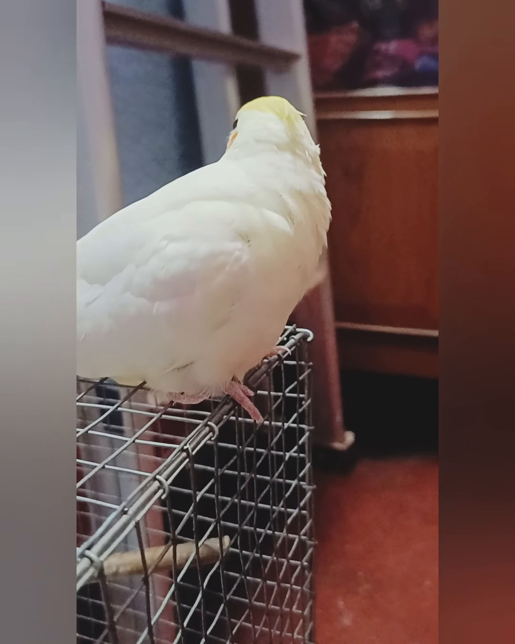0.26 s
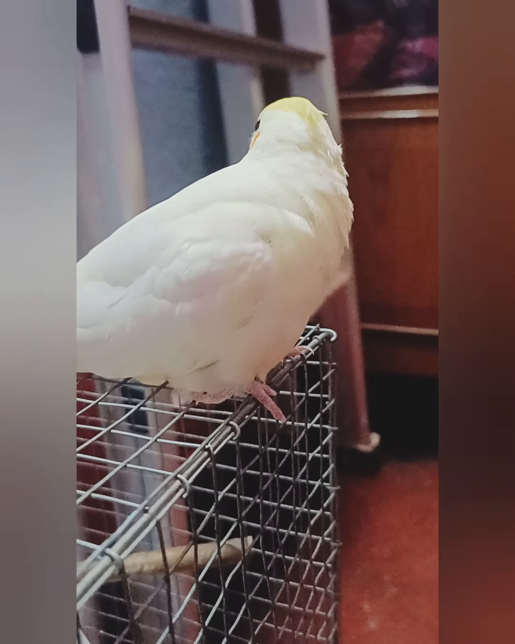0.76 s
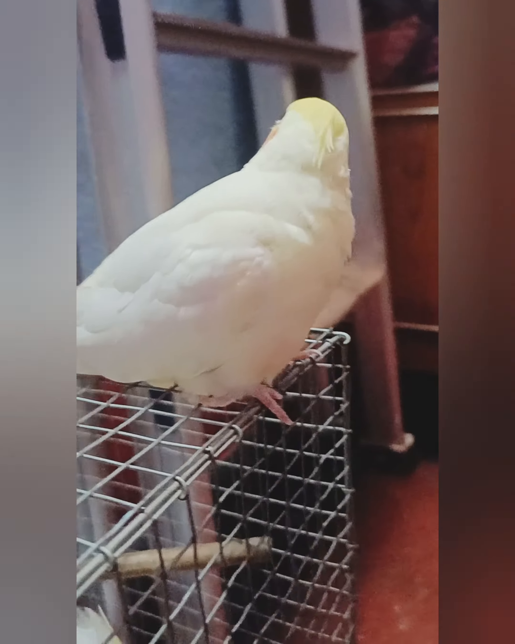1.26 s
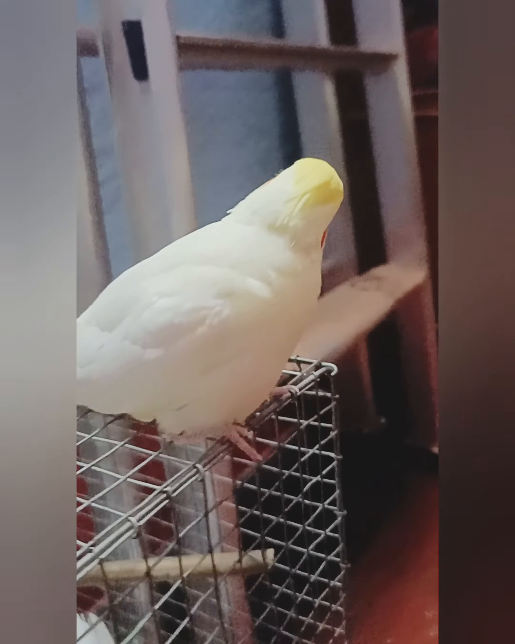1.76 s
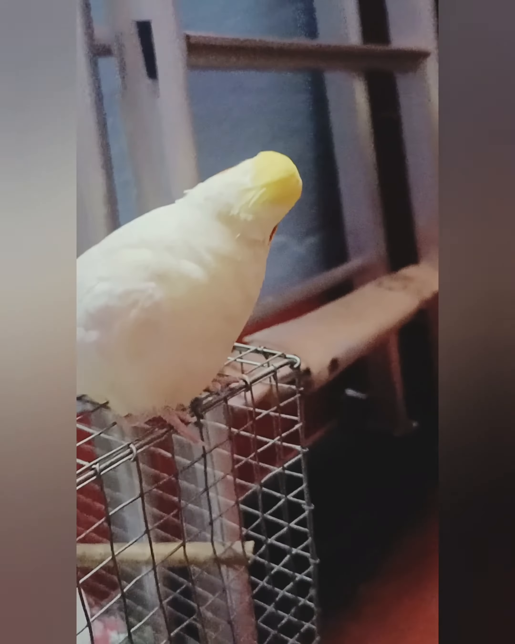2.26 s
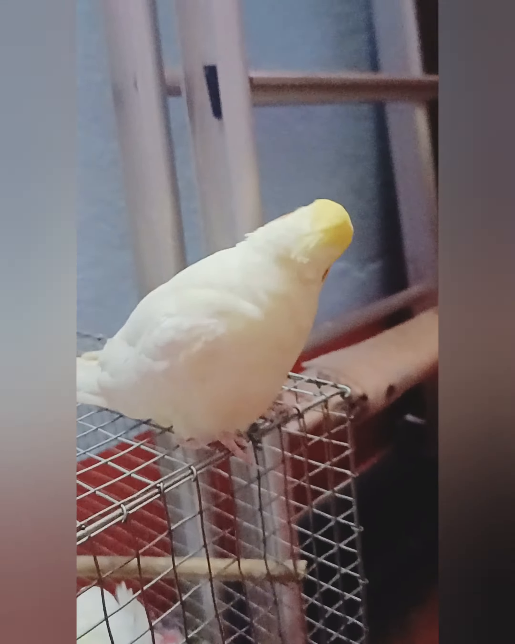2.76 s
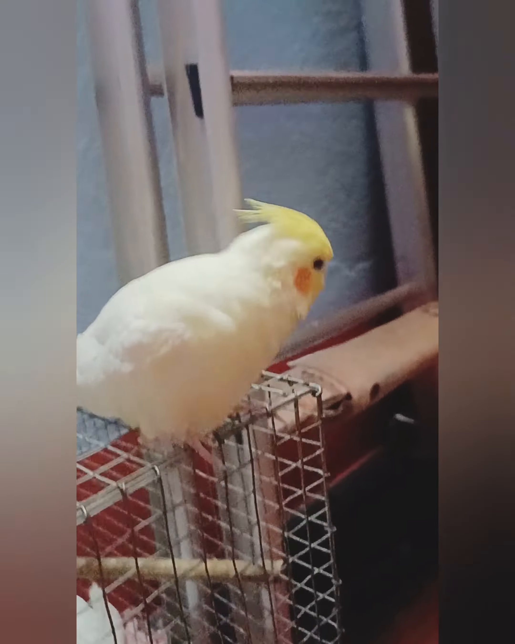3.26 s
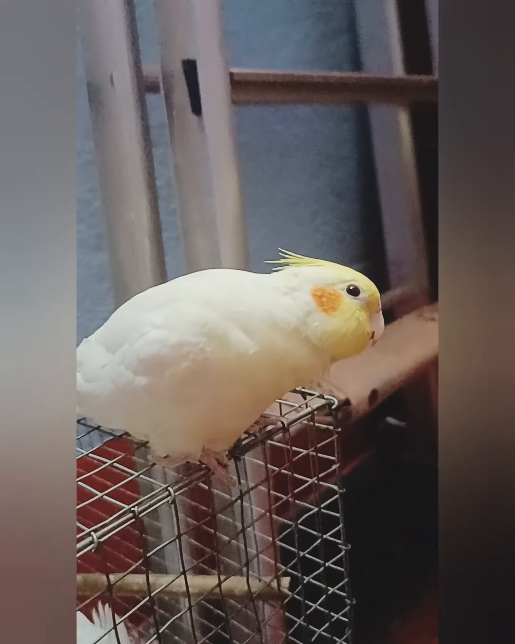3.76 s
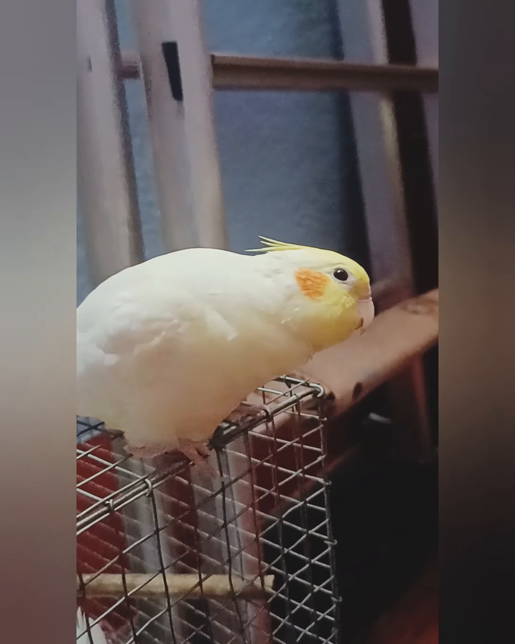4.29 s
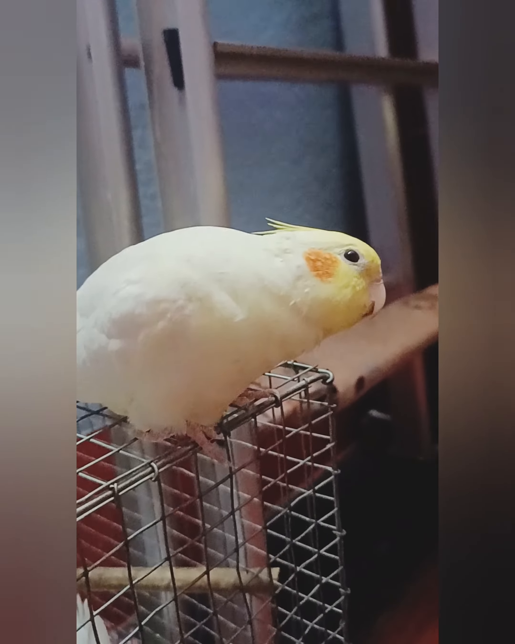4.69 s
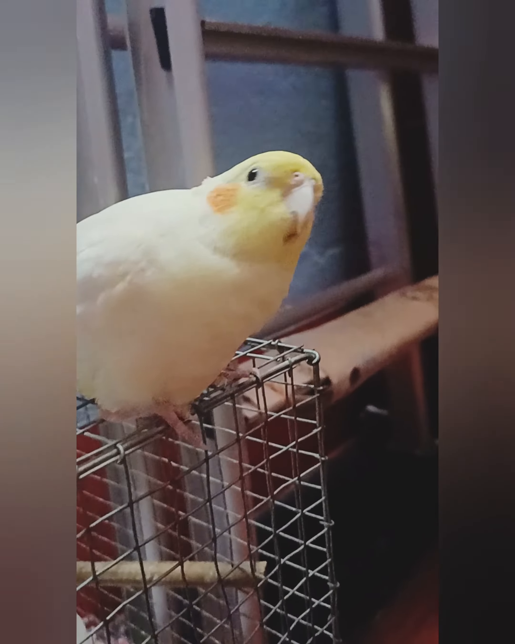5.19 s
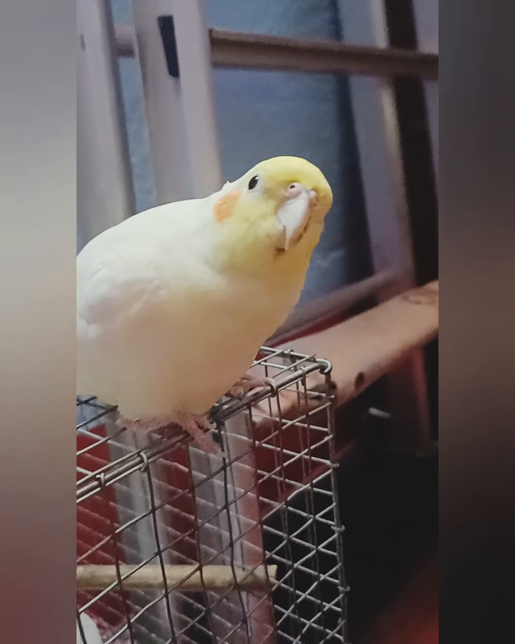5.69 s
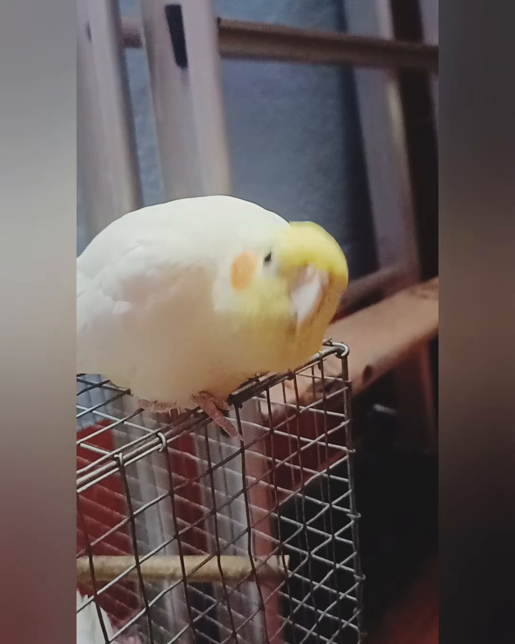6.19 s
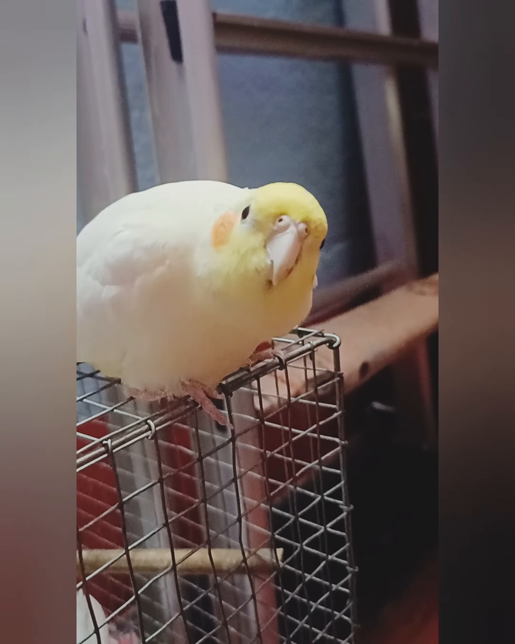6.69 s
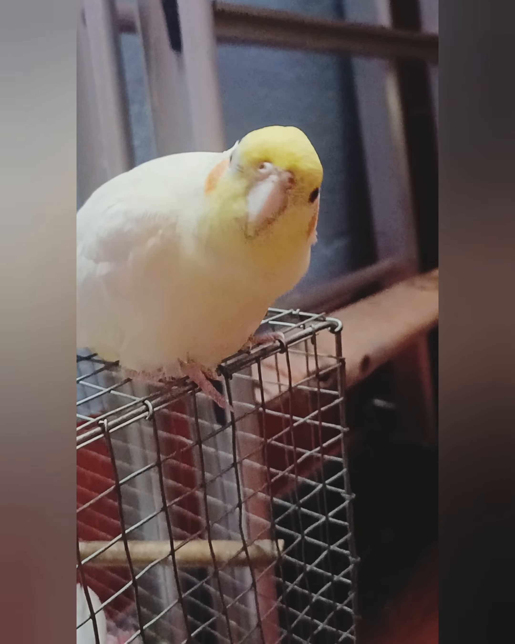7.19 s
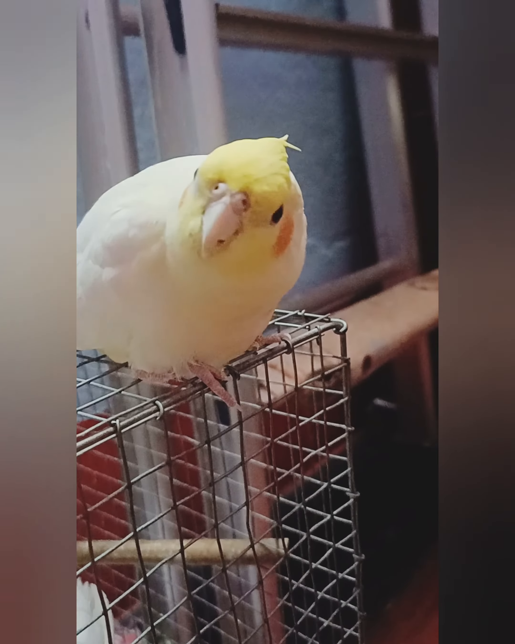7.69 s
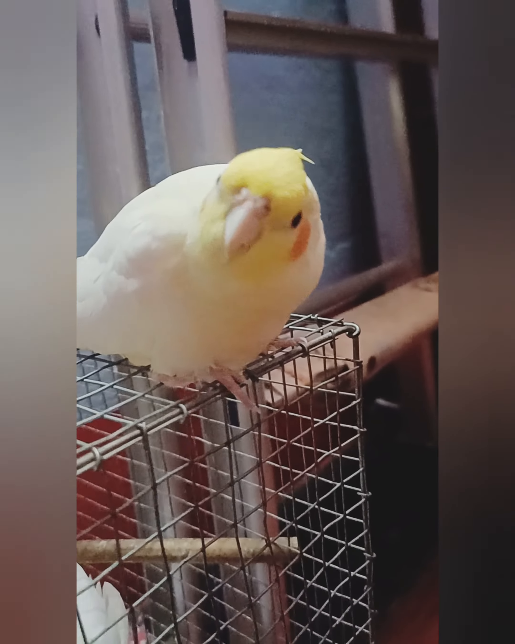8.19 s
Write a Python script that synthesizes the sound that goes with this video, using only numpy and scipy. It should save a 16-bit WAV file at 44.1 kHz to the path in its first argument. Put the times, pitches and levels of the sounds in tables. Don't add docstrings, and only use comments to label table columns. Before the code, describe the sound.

Close stereo pickup of a pet cockatiel indoors. Very soft thin peeps and short buzzes open, followed by near silence. A strong nasal whistle at three seconds leads to clicks, a woody tongue pop, faint squeaks and a quick sneeze. After more quiet, rough stuttering squawks come in a pair, then a brief one and a long raspy one. The small room adds a short echo, with noise-suppressed hum and hiss breathing behind.

```python
import sys
import numpy as np
from scipy import signal
from scipy.fft import rfft, irfft, next_fast_len
from scipy.io import wavfile
from scipy.ndimage import uniform_filter1d

SR = 44100
rng = np.random.default_rng(int(sys.argv[2]) if len(sys.argv) > 2 else 0)


def attenuation_scalar(level_db):
    decades = np.asarray(level_db, float) / 20
    return 10 ** decades


def master_out(mix):
    frames = np.transpose(np.atleast_2d(mix))
    ceiling = np.clip(frames, -1, 1)
    pcm = np.round(ceiling * 32767).astype(np.int16)
    wavfile.write(sys.argv[1], SR, pcm)


N = 372644

# time_s, pitch_hz, effort_db
CALLS = [
    [(3.308, 2050, -49), (3.33, 1387, -45), (3.352, 1118, -42), (3.47, 1220, -42), (3.62, 1190, -38),
     (3.657, 1154, -33), (3.678, 1140, -39.5), (3.692, 1155, -57.5), (3.775, 1162, -65.5)],
    [(6.434, 1291, -55.5), (6.48, 1245, -47), (6.572, 1289, -41), (6.607, 1230, -47.5), (6.615, 1260, -71)],
    [(6.715, 1470, -58.5), (6.749, 1234, -44.5), (6.839, 1369, -44), (6.881, 1262, -39), (6.935, 1444, -46),
     (6.955, 1500, -72)],
    [(7.535, 1202, -78), (7.551, 1220, -52.5), (7.595, 1232, -46), (7.657, 1120, -46), (7.675, 1070, -81)],
    [(7.855, 1245, -72), (7.865, 1215, -45.5), (8.203, 1258, -40), (8.25, 1201, -36), (8.333, 1359, -37),
     (8.379, 1264, -40.5), (8.4, 1250, -82)],
]
# stutter_share (of the start in bursts), roughness_0_to_1, flutter_db, rasp_db,
# air_db (the last two against effort)
TEMPER = [
    (0.058, .01, -16.5, -47, -58),
    (1, 0.57, -3.5, -23, -30.5),
    (0.063, 0.63, -2, -20, -23.5),
    (0.5, .4, -9.5, -20.5, -22.5),
    (0.86, 0.15, -8.5, -25.5, -26),
]


def calls():
    rest_hz, strain_hz = 1220, 160
    leak_follows = 0.63
    gape_opens_s, gape_shuts_s, gape_ramp_s = 8.25, 8.355, .025
    out = np.zeros(N)
    for rows, (stutter, hoarse, loose_db, rasp_db, air_db) in zip(CALLS, TEMPER):
        span, fade, (pitch, voice_db) = unroll(rows)
        size = len(fade)
        age_s = np.arange(size) / SR
        clock_s = span.start / SR + age_s

        strain = np.clip((pitch - rest_hz) / strain_hz, 0, 1)
        rough = hoarse + 0.18 * strain
        flutter = attenuation_scalar(loose_db + 7 * strain)
        peak_db = voice_db.max()
        leak_db = peak_db + leak_follows * (voice_db - peak_db) + np.minimum(voice_db + 53.5, 0)

        jitter = 0.014 * rough * wobble(size, hz=85.3) + .009 * wobble(size, hz=22.8)
        cycles = np.cumsum(pitch * (1 + jitter)) / SR
        beat = cycles / 4 + .055 * wobble(size, hz=45)
        slaps = (np.diff(np.floor(beat), prepend=0) > 0) * attenuation_scalar(2.5 * wobble(size, hz=300))

        uneven = period_doubling(clock_s)
        tone = whistle(cycles, pitch, voice_db, rough, loose_db, uneven)
        voice = (tone + flutter * throat_ring(slaps) / (1 + 3 * uneven)) / np.sqrt(1 + flutter ** 2)
        voice = limit_swing(voice)

        puffs = rng.standard_normal(size) * (0.84 + np.cos(np.pi * beat) ** 4)
        gape = np.clip(np.minimum(clock_s - gape_opens_s, gape_shuts_s - clock_s) / gape_ramp_s, 0, 1)
        leak = attenuation_scalar(rasp_db) * rasp(puffs, slaps, cycles, pitch, gape) + attenuation_scalar(air_db) * escaping_air(puffs, gape)

        throb_db = 1.1 * wobble(size, hz=24)
        sound = attenuation_scalar(voice_db + throb_db) * voice + attenuation_scalar(leak_db) * leak
        out[span] += fade * bursts(age_s, stutter) * sound
    return out


def whistle(cycles, pitch, voice_db, rough, loose_db, uneven):
    turn = np.exp(2j * np.pi * cycles)
    half = np.exp(1j * np.pi * cycles)
    octave_db = np.minimum(2.2 * (voice_db + 42.0) - 23.0, -15) - .7 * loose_db - 10.5
    octave = attenuation_scalar(octave_db) * (1150 / pitch) ** 5
    harmonics = turn + octave * turn ** 2 + .4 * octave ** 2 * turn ** 3
    half_lines = half ** 3 + .45 * half ** 4 + .15 * half ** 5 + .1 * half ** 6
    stack = harmonics + uneven * half_lines
    return (stack * unsteady(rough / (1 + 2 * uneven), hz=190)).real * np.sqrt(2)


# start_s, end_s, level_db
DOUBLED = [
    (6.717, 6.781, 0),
    (8.283, 8.339, -9.5),
]


def period_doubling(clock_s):
    return sum(attenuation_scalar(db) * np.clip(np.minimum(clock_s - start, end - clock_s) / 0.0013, 0, 1)
               for start, end, db in DOUBLED)


# centre_hz, width_hz, level_db
THROAT = [(1418, 460, 2), (1746, 670, -0.5), (2680, 290, -10)]


def throat_ring(slaps):
    modes = [(-1) ** k * attenuation_scalar(db) * resonance(slaps, hz, width) for k, (hz, width, db) in enumerate(THROAT)]
    band = signal.butter(4, [850, 2800], "band", fs=SR, output="sos")
    return signal.sosfilt(band, rms_one(sum(modes)))


def limit_swing(voice):
    swing = np.abs(signal.hilbert(voice)) + 1e-9
    voice = voice * np.tanh(1.2 * swing) / swing * 1.97
    return signal.sosfilt(signal.butter(4, [880, 4400], "band", fs=SR, output="sos"), voice)


# frequency_hz, density_db (per Hz)
RASP = [(1650, -23), (2800, -3.5), (3510, 1.5), (4350, -7.5), (4770, -10.5), (5600, -11), (6200, -33.5),
        (8450, -38.5), (14300, -120)]
# frequency_hz, density_db (per Hz)
GAPE_RASP = [(1400, -14), (1900, 4.5), (2700, 8), (3300, -21), (4200, -32), (5000, -7), (5600, -30),
             (6100, -45)]


def rasp(puffs, slaps, cycles, pitch, gape):
    size = len(puffs)
    half = np.exp(1j * np.pi * cycles)
    bands = 0
    for k in range(4, 10):
        band_db = at_hz(RASP, k * pitch / 2) + 3.5 * wobble(size, hz=12)
        bands = bands + half ** k * unsteady(np.ones(size), hz=130) * attenuation_scalar(band_db)
    noise = colour(puffs + 0.33 * rms_one(slaps), RASP)
    usual = rms_one(noise + attenuation_scalar(-2.5) * rms_one(bands.real))
    return usual + gape * attenuation_scalar(13.5) * colour(puffs, GAPE_RASP)


# frequency_hz, density_db (per Hz)
AIR = [(4000, -44.5), (7100, -20.5), (8130, -3.5), (9460, -1.5), (10000, -7), (10700, -15.5),
       (12400, -21.5), (13000, -31), (13500, -38), (14200, -48.5)]
# frequency_hz, density_db (per Hz)
GAPE_AIR = [(8000, -37), (10500, -1), (12000, 7), (13200, -2), (14000, -33), (15500, -15), (16500, -36)]


def escaping_air(puffs, gape):
    return attenuation_scalar(-22 * gape) * colour(puffs, AIR) + gape * attenuation_scalar(-9) * colour(puffs, GAPE_AIR)


def bursts(age_s, stutter):
    settling = np.exp(-(age_s / age_s[-1] / 0.29) ** 2)
    phase = 74 * age_s + 0.46 * wobble(len(age_s), hz=25)
    return 1 - np.clip(stutter, 0, 1) * settling * np.cos(np.pi * phase) ** 2


# time_s, pitch_hz, level_db
SECOND = [(3.312, 2725, -49.5), (3.35, 1735, -47), (3.43, 1632, -57), (3.594, 1686, -41.5),
          (3.62, 1800, -47), (3.674, 1540, -48), (3.69, 1715, -66)]


def second_voice():
    out = np.zeros(N)
    span, fade, (pitch, level_db) = unroll(SECOND)
    main = np.interp(np.arange(span.start, span.stop) / SR, *np.transpose(CALLS[0])[:2])
    high, low = np.exp(2j * np.pi * np.cumsum([pitch, main], axis=1) / SR)
    sum_tone = attenuation_scalar(-23.5) * high * low * (1680 / pitch) ** 6
    difference_tone = attenuation_scalar(-6.0) * low ** 3 / high * (1680 / pitch) ** 5
    growing_rough = np.linspace(.03, .35, len(fade))
    tones = (high + sum_tone + difference_tone) * unsteady(growing_rough, hz=90)
    out[span] = fade * attenuation_scalar(level_db) * np.sqrt(2) * tones.real
    return out


# start_s, length_s, first_pitch_hz, last_pitch_hz, level_db
PEEPS = [
    (.336, 0.076, 2820, 2870, -61),
    (.102, 0.057, 2690, 2266, -62),
    (.546, 0.03, 2570, 2200, -63),
    (.581, 0.038, 1640, 1520, -72.5),
    (1.208, 0.06, 1180, 1116, -55.5),
]
PEEP_PARTIALS_DB = [3, -7, -26, -38]
# start_s, length_s, first_pitch_hz, last_pitch_hz, level_db
CHURRS = [
    (.144, 0.044, 1097, 1015, -59),
    (.826, 0.064, 880, 673, -55.5),
    (.882, 0.046, 652, 620, -59),
]
CHURR_PARTIALS_DB = [-4.5, -1, -5.5, -9]
# start_s, length_s, first_pitch_hz, last_pitch_hz, level_db
SQUAWKS = [(1.165, 0.043, 1590, 1430, -58.5), (3.26, 0.042, 2780, 2700, -58),
           (4.212, 0.047, 2900, 2700, -59.5), (4.212, 0.044, 1547, 1150, -66),
           (4.458, 0.032, 2840, 2685, -64.5), (5.827, 0.027, 3490, 3500, -59.5),
           (5.827, 0.027, 4310, 4090, -59), (6.12, 0.045, 4020, 2560, -66.5),
           (6.14, 0.0373, 1547, 1295, -54)]


def chirps():
    peeps = notes(PEEPS, PEEP_PARTIALS_DB, rough=.15, smear=.08)
    churrs = notes(CHURRS, CHURR_PARTIALS_DB, rough=.45, smear=.09)
    squawks = notes(SQUAWKS, [0, -12, -30, -40], rough=.85, smear=.085, rise_s=0.0059)
    return peeps + churrs + squawks + breath_puffs()


# frequency_hz, level_db
TRACT = [(600, -20), (900, -5.5), (1300, 3), (2500, 3), (3600, -0.5), (6000, -19.5), (9000, -27)]


def notes(rows, partials_db, rough, smear, rise_s=0.015):
    settle_share = .6
    out = np.zeros(N)
    for start, length, first_hz, last_hz, level_db in rows:
        span, progress, shape = swell(start, length, rise_s, fall_s=0.011)
        slide = (1 - np.exp(-progress / settle_share)) / (1 - np.exp(-1 / settle_share))
        shake = 1 + .018 * wobble(len(slide), hz=45)
        pitch = (first_hz + (last_hz - first_hz) * slide) * shake
        turn = np.exp(2j * np.pi * np.cumsum(pitch) / SR)
        tone = 0
        for k, db in enumerate(partials_db, 1):
            gain = attenuation_scalar(db + at_hz(TRACT, k * pitch))
            tone = tone + gain * turn ** k * unsteady(rough + 0 * pitch, hz=smear * last_hz)
        out[span] += shape * attenuation_scalar(level_db) * np.sqrt(2) * tone.real
    return out


# start_s, length_s, level_db, rise_s, high_air_db (added)
PUFFS = [(0.111, 0.097, -64, 0.039, -21), (0.337, 0.1, -62.5, 0.015, -15.5),
         (0.549, 0.082, -62.5, 0.017, -22), (0.814, .11, -56, 0.0086, -35), (1.166, 0.05, -59.5, .008, -34),
         (3.264, 0.045, -59.5, 0.0055, -38), (4.211, 0.066, -62, 0.025, -47),
         (4.46, 0.061, -74, 0.012, -27), (5.83, 0.033, -55.5, 0.0033, -15),
         (6.124, 0.059, -49.5, 0.023, -26.5)]
# frequency_hz, density_db (per Hz)
BREATH = [(590, -48.5), (1000, -26), (1580, -8), (2150, -13), (2460, -4.5), (3700, -24), (4490, -26.5),
          (9000, -40), (11500, -93), (15000, -85), (22000, -120)]


def breath_puffs():
    out = np.zeros(N)
    for start, length, level_db, rise_s, high_db in PUFFS:
        span, progress, shape = swell(start, length, rise_s, fall_s=0.037)
        size = len(shape)
        rush = rng.standard_normal(size) * attenuation_scalar(1.5 * wobble(size, hz=200))
        breath = colour(rush, BREATH) + attenuation_scalar(high_db) * colour(rush, AIR)
        out[span] += shape * attenuation_scalar(level_db - 2 * progress) * breath
    return out


# time_s, peak_db, dull_part_db (against peak)
CLICKS = [(1.5194, -68, 6), (3.5084, -59, 18), (3.5124, -45, 12), (3.5279, -43, 21), (3.585, -54.5, -4.5),
          (3.628, -46, 2.5), (5.5737, -61, -3), (6.4772, -50, 11), (6.6674, -63, -5), (7.5408, -53, 17),
          (7.8446, -73, 27), (8.2835, -56, 26)]


def ticks():
    s, peak_db, dull_db = np.transpose(CLICKS)
    strikes = np.zeros((2, N))
    strikes[:, np.round(s * SR).astype(int)] = attenuation_scalar([peak_db, peak_db + dull_db])
    snap = resonance(resonance(strikes[0], hz=8800, width_hz=3000), hz=8800, width_hz=3000)
    knock = resonance(resonance(strikes[1], hz=2700, width_hz=970), hz=2200, width_hz=600)
    return attenuation_scalar(9.0) * (snap + knock)


# time_s, level_db
TOCK = [
    [(3.9686, -47), (3.971, -34), (3.982, -40.5), (3.99, -66)],
    [(3.99, -49.5), (4.09, -76.5)],
]
# frequency_hz, density_db (per Hz)
BEAK = [(650, -58), (1100, -31), (1450, -2.5), (1640, -0.5), (2390, -9), (2480, -17), (2980, -12),
        (3900, -37), (4650, -29.5), (6660, -39.5), (8710, -31.5), (9370, -35), (10000, -78), (13000, -103),
        (22000, -120)]
# frequency_hz, level_db
MOUTH = [(1520, -2.5), (1830, -20)]


def cluck():
    out = sum(gust(rows, BEAK, grain_db=3.0) for rows in TOCK)
    span, fade, (level_db,) = unroll(TOCK[0])
    age_s = np.arange(len(fade)) / SR
    tones = sum(attenuation_scalar(db) * np.sin(2 * np.pi * hz * age_s) for hz, db in MOUTH)
    out[span] += fade * attenuation_scalar(level_db + 2.5) * tones
    return out


# time_s, level_db
SNEEZE = [(4.828, -70), (4.838, -46.5), (4.87, -50), (4.94, -77)]
# frequency_hz, density_db (per Hz)
SNORT = [(530, -49), (900, -17), (1630, -0.5), (2680, -3), (2790, -3), (4610, -20), (5550, -6.5),
         (7400, -31), (8370, -25), (10500, -62), (13600, -94), (22000, -120)]
# time_s, level_db
RUSTLE = [(2.1, -108), (2.146, -102), (2.86, -87.5), (3.03, -102), (3.1, -114)]
# frequency_hz, density_db (per Hz)
FEATHERS = [(5500, -10), (7500, -14), (9000, -1), (11000, -10), (13000, -32)]
# time_s, level_db
SIGH = [(3.5, -98), (3.61, -76.5), (3.68, -91), (3.7, -96)]


def rushes():
    sneeze = gust(SNEEZE, SNORT, grain_db=1.5)
    rustle = gust(RUSTLE, FEATHERS, grain_db=1.5)
    sigh = gust(SIGH, AIR, grain_db=7.0)
    return sneeze + rustle + sigh


def gust(rows, spectrum, grain_db):
    out = np.zeros(N)
    span, fade, (level_db,) = unroll(rows)
    size = len(fade)
    grains = rng.standard_normal(size) * attenuation_scalar(grain_db * wobble(size, hz=253))
    out[span] = fade * attenuation_scalar(level_db) * colour(grains, spectrum)
    return out


# time_s, left_excess_low_db, left_excess_high_db
FACING = [
    (0, -1, 12),
    (3.399, 5, 2),
    (5, 5, -7.5),
    (6.5, 5, 17.5),
    (8.45, 5.5, 15.5),
]
# frequency_hz, phase_rad
PORT_PHASE = [(0, 0), (2410, 2.5), (3620, 5.5), (5340, 7.5), (6120, 11.5), (7670, 11), (8870, 14),
              (9390, 14.5), (9820, 14), (10200, 8.5), (11000, 9.5), (12500, 11.5), (13000, 17), (15300, 19)]


def ports(x):
    s, *columns = np.transpose(FACING)
    low_db, high_db = [np.interp(np.arange(N) / SR, s, c) for c in columns]
    low = signal.sosfiltfilt(signal.butter(2, 2100, fs=SR, output="sos"), x)
    high = signal.sosfiltfilt(signal.butter(3, 6600, "high", fs=SR, output="sos"), x)
    left, right = [x + low * (attenuation_scalar(side * low_db / 2) - 1) + high * (attenuation_scalar(side * high_db / 2) - 1)
                   for side in (1, -1)]
    size = N + 92
    lag = np.exp(-1j * np.interp(np.fft.rfftfreq(size, 1 / SR), *np.transpose(PORT_PHASE)))
    return np.array([left, irfft(rfft(right, size) * lag)[:N]])


def room(x):
    t60_s, level_db = .16, -19
    t = np.arange(int(.4 * SR)) / SR
    tail = rng.standard_normal((2, len(t))) * attenuation_scalar(-60 * t / t60_s) * (t > .004)
    tail = signal.sosfilt(signal.butter(1, 5000, fs=SR, output="sos"), tail)
    tail = tail / np.sqrt(np.sum(tail ** 2) / 2)
    return attenuation_scalar(level_db) * signal.fftconvolve(x[None], tail, axes=1)[:, :N]


def suppressor_gain(bird, shut_db=-67.5, slope=0.37, fall_db_per_s=263.5):
    level_db = 10 * np.log10(uniform_filter1d(bird ** 2, size=900) + 1e-12)
    ramp = fall_db_per_s * np.arange(N) / SR
    held_db = np.maximum.accumulate(level_db + ramp) - ramp
    lift_db = slope * np.clip(held_db - shut_db, 0, 40)
    return attenuation_scalar(uniform_filter1d(lift_db, size=700) + 0.52 * wobble(N, hz=5.7))


# frequency_hz, density_db (per Hz)
HUM = [(15, -58.5), (25, -27.5), (43, 1.5), (76, -7), (114, -1.5), (151, -8.5), (220, -6.5), (306, -12),
       (340, 0), (366, -8.5), (389, -4), (549, -8.5), (600, -10), (763, -10), (900, -12.5), (1170, -54),
       (1980, -120)]
# frequency_hz, density_db (per Hz)
HISS = [(530, -22.5), (900, -11.5), (1000, -3), (1320, -4), (1380, -3.5), (1620, -5.5), (2030, -12),
        (2260, -13), (3120, -24.5), (4790, -30), (5210, -25), (6090, -35), (7030, -27.5), (10300, -38),
        (15600, -35.5)]
# frequency_hz, coherence_0_to_1
LIKENESS = [(60, 1), (130, 0.87), (300, 0.75), (700, 0.71), (1400, 0.31), (3000, 0.15), (8000, 0.039)]


def background(gain):
    size = N + 92
    hz = np.fft.rfftfreq(size, 1 / SR)
    alike = np.clip(at_hz(LIKENESS, hz), 0, .99)
    shared, left, right = rfft(rng.standard_normal((3, size)))
    late = shared * np.exp(-2j * np.pi * hz * 11.05 / SR)
    mixed = np.sqrt(alike) * np.array([shared, late]) + np.sqrt(1 - alike) * np.array([left, right])
    white = irfft(mixed)[:, :N]
    return gain * attenuation_scalar(-68.5) * colour(white, HUM) + gain ** 0.99 * attenuation_scalar(-75.5) * colour(white, HISS)


def rms_one(x):
    return x / np.sqrt(np.mean(np.abs(x) ** 2) + 1e-20)


def at_hz(points, hz):
    known_hz, values = np.array(points).T[:2]
    return np.interp(np.log(hz + 1), np.log(known_hz), values)


def colour(x, spectrum):
    size = next_fast_len(x.shape[-1])
    response = attenuation_scalar(at_hz(spectrum, np.fft.rfftfreq(size, 1 / SR)))
    return rms_one(irfft(rfft(x, size) * response, size)[..., :x.shape[-1]])


def wobble(size, hz):
    r = np.exp(-2.6 * np.pi * hz / SR)
    pole_pair = [1, 0, 0, 1, -2 * r, r * r]
    return rms_one(signal.sosfilt([pole_pair, pole_pair], rng.standard_normal(size + 4000))[4000:])


def resonance(x, hz, width_hz):
    r = np.exp(-np.pi * width_hz / SR)
    zeros = np.array([1, 0, -1]) * (1 - r * r) / 2
    return signal.lfilter(zeros, [1, -2 * r * np.cos(2 * np.pi * hz / SR), r * r], x)


def unsteady(rough, hz):
    rough = np.clip(rough, 0, 1)
    chaos = wobble(len(rough), hz) + 1j * wobble(len(rough), hz)
    return np.sqrt(1 - rough) + np.sqrt(rough / 2) * chaos


def unroll(rows):
    s, *columns = np.transpose(rows)
    at = np.arange(round(s[0] * SR), min(round(s[-1] * SR), N))
    fade = np.clip(np.minimum(at - at[0], at[-1] - at) / (0.00045 * SR), 0, 1)
    return slice(at[0], at[-1] + 1), fade, [np.interp(at / SR, s, c) for c in columns]


def swell(start, length, rise_s, fall_s):
    age_s = np.arange(round(length * SR)) / SR
    shape = np.clip(np.minimum(age_s / rise_s, (length - age_s) / fall_s), 0, 1) ** 0.81
    first = round(start * SR)
    return slice(first, first + len(age_s)), age_s / length, shape


def scene():
    bird = calls() + second_voice() + chirps() + ticks() + cluck() + rushes()
    gain = suppressor_gain(bird)
    return ports(bird) + room(bird) * gain / attenuation_scalar(3.0) + background(gain)


def band_limit(x):
    return signal.sosfilt(signal.butter(12, 15800, fs=SR, output="sos"), x)


def record(dry):
    return band_limit(dry)


dry = scene()
out = record(dry)
master_out(out)
```